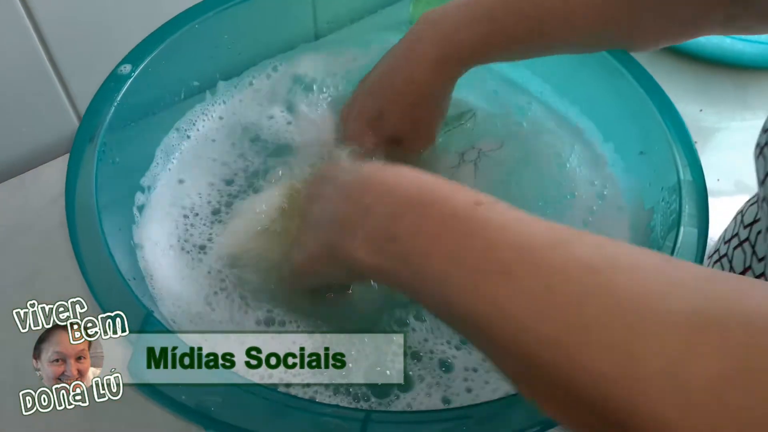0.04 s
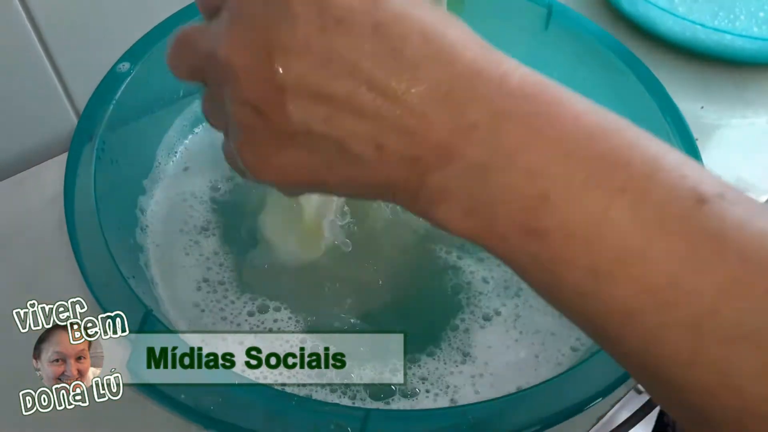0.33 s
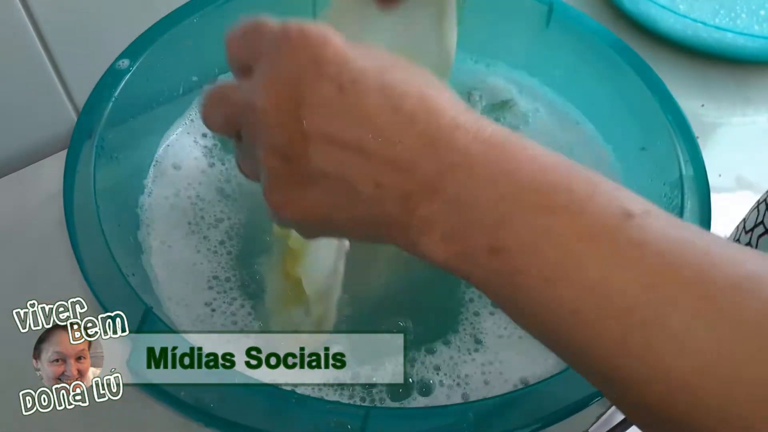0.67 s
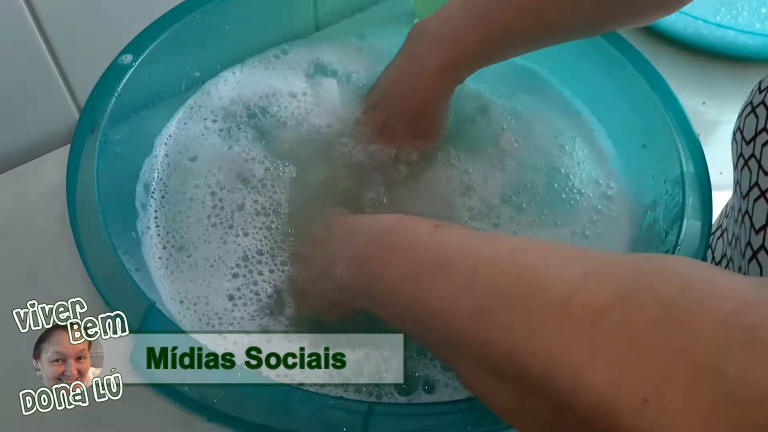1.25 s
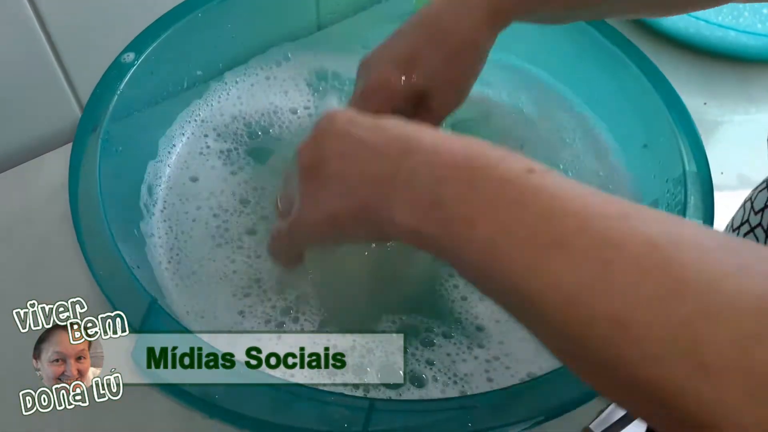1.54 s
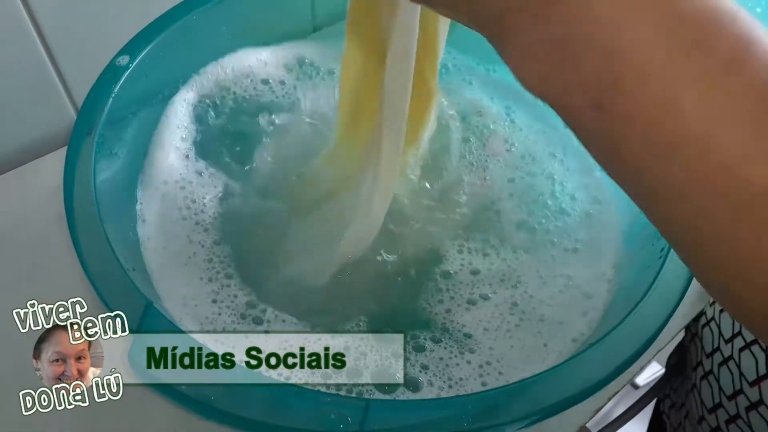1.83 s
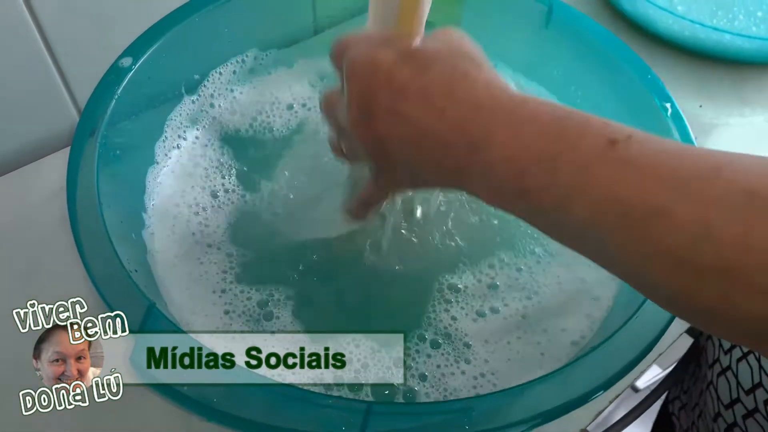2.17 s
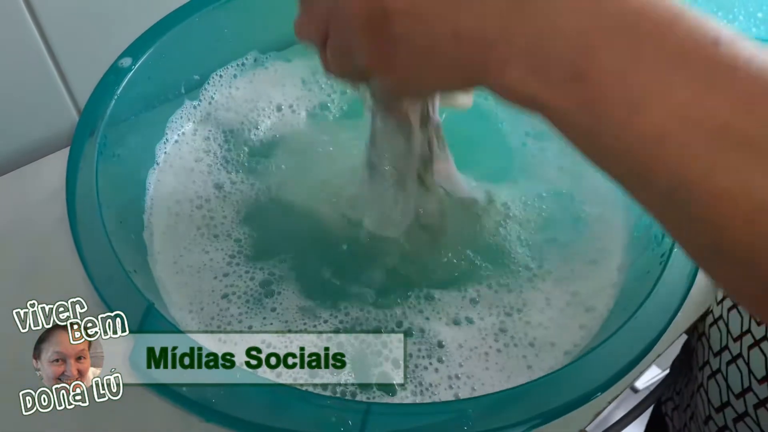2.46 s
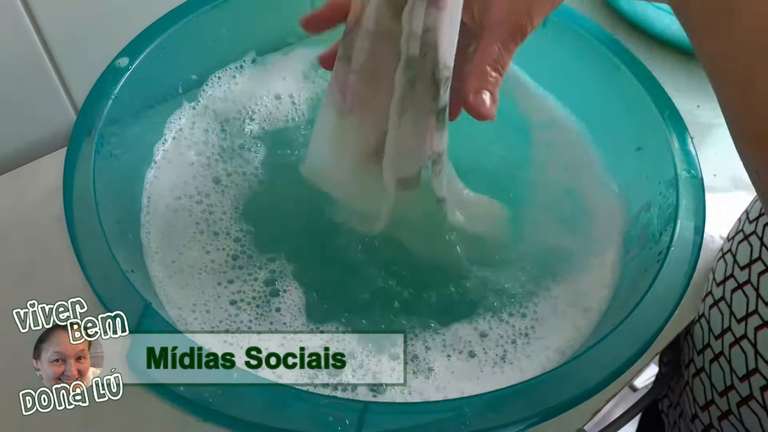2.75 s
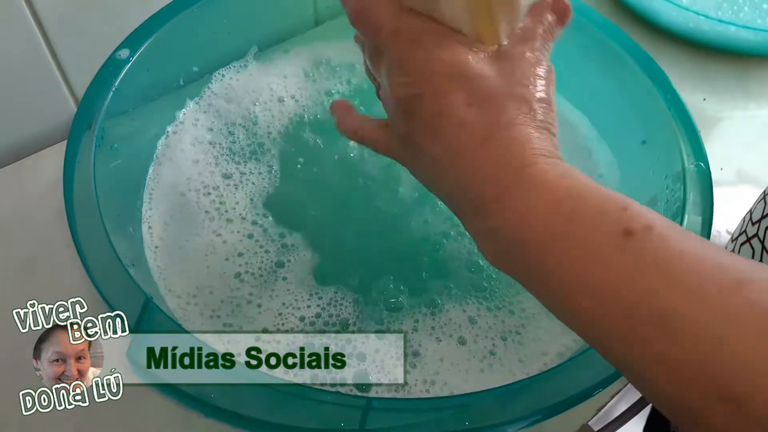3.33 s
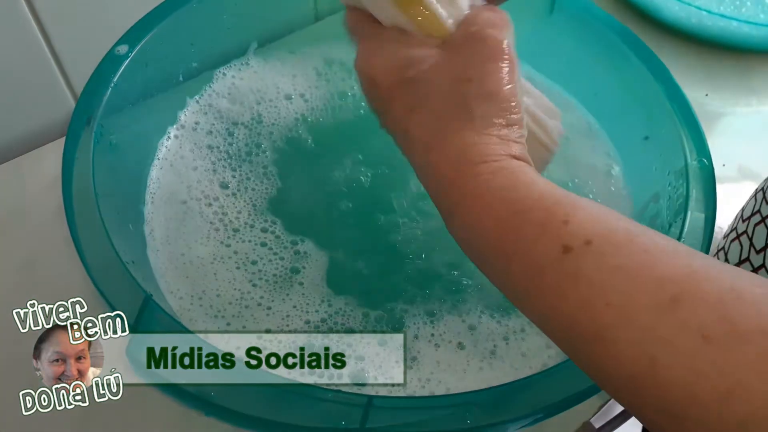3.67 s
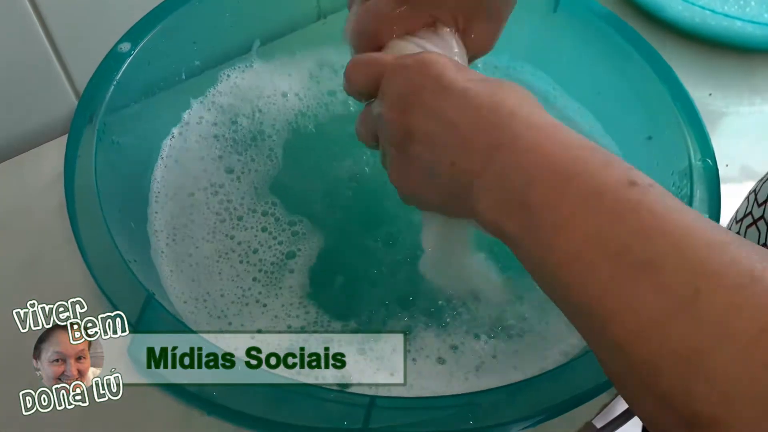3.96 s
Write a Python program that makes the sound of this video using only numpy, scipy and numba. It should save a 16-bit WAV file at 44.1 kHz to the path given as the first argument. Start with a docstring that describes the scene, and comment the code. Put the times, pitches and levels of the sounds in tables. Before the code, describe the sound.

Close splashing and bubbling of soapy water as a cloth is washed by hand in a basin. After a short lull, more sloshes, drips and plops follow. The small tiled room rings briefly, with a faint rumble underneath.

```python
"""A cloth is dunked, lifted and squeezed in a plastic basin of soapy water, in a small tiled room.
A low rumble and a wavering hum lie under it all. From the start each move stirs up swarms of bubbles and
throws spray; air pockets plop and falling water slaps the surface, building to a splashy peak near 0.9 s.
After a lull the cloth moves again from 1.5 s, with the sharpest slap at 2.7 s, deep plops at 3.2 s and
a last slosh just before 4 s. The room rings briefly after each splash."""
import sys
import numpy as np
from scipy import signal
from scipy.fft import rfft, irfft
from scipy.io import wavfile
from scipy.ndimage import map_coordinates
from numba import njit

SR = 44100
rng = np.random.default_rng(int(sys.argv[2]) if len(sys.argv) > 2 else 0)


def log_audio(samples):
    """Write samples as a 16-bit WAV file to the path given in sys.argv[1]."""
    # one column per channel
    frames = np.atleast_2d(samples).T
    # limit to full scale, then quantise
    limited = np.clip(frames, -1, 1)
    pcm = np.round(limited * 32767).astype(np.int16)
    wavfile.write(sys.argv[1], SR, pcm)


N = 176400
TIME = np.arange(N) / SR


def from_db(db):
    """Decibels to gain."""
    return 10 ** (np.asarray(db) / 20)


def rms_one(x):
    """Scale to unit rms."""
    return x / np.sqrt(np.mean(x ** 2) + 1e-20)


def band(x, low_hz, high_hz):
    """Band-pass."""
    sos = signal.butter(2, [low_hz, min(high_hz, .45 * SR)], "band", fs=SR, output="sos")
    return signal.sosfilt(sos, x)


def panned(x, pan_db):
    """Mono to stereo by a level difference; positive is left."""
    return x * from_db([[pan_db / 2], [-pan_db / 2]])


def add(out, start, x):
    """Mix a short stereo sound in at `start` seconds."""
    i = max(int(start * SR), 0)
    out[:, i:i + x.shape[1]] += x[:, :max(N - i, 0)]


def wander(shape, speed_hz):
    """Random drift of unit rms, mostly slower than speed_hz."""
    hz = np.fft.rfftfreq(N, 1 / SR)
    return rms_one(irfft(rfft(rng.standard_normal(shape)) / (1 + (hz / speed_hz) ** 2), N))


def diffuse_noise(size, spacing_m_per_c=0.00054):
    """Noise from all sides at two mics (spacing in s of travel): alike in the bass, wide in the treble."""
    alike = .98 * np.sinc(2 * np.fft.rfftfreq(size, 1 / SR) * spacing_m_per_c)
    mid, side = rfft(rng.standard_normal((2, size)))
    return irfft(np.sqrt((1 + alike) / 2) * mid + np.sqrt((1 - alike) / 2) * side * [[1], [-1]], size)


# Spectrum of the room tone: (frequency [Hz], density [dB per Hz])
ROOM_TONE = [(15, -122), (25, -101), (40, -78.5), (60, -78.5), (110, -75.5), (180, -78), (250, -82),
             (390, -78), (560, -86.5), (1100, -89.5), (2000, -100), (3200, -109), (6000, -121),
             (10000, -113), (16000, -120)]


def room_tone(hum_hz=123, hum_db=-58):
    """A steady bed of rumble and faint hiss, with a hum that wavers in level and phase."""
    hz = np.fft.rfftfreq(N, 1 / SR)
    points_hz, density_db = np.transpose(ROOM_TONE)
    colour = from_db(np.interp(np.log(hz + 1), np.log(points_hz), density_db))
    rumble = irfft(rfft(diffuse_noise(N)) * colour, N) * np.sqrt(SR / 2)
    swell, slip = 0.99 * wander((2, N), speed_hz=2)
    hum = (1 + swell / 2) * np.sin(2 * np.pi * hum_hz * TIME + slip)
    return rumble + from_db(hum_db) * rms_one(hum)


# Fader ride of the water running off the cloth: (time [s], level [dB])
RUNOFF = [(0, -8), (.3, 6), (1.0, 7.5), (1.1, -47), (1.46, -34), (1.68, 3.5), (2.8, 0), (3.05, 1.5),
          (3.3, 2.5), (4, 0.5)]
# Moves of the cloth and how hard each drives the three swarms:
# (time [s], length [s], large bubbles [dB], small bubbles [dB], spray [dB])
CLOTH_MOVES = [(0.107, 0.1, -52.5, -64, -76), (0.214, 0.1, -50, -56.5, -62),
               (0.364, 0.022, -61, -49.5, -53.5), (0.454, 0.05, -43.5, -55, -50.5),
               (0.496, 0.083, -68, -59, -79), (0.633, 0.086, -41, -43.5, -47),
               (0.696, 0.076, -39, -41.5, -46), (0.768, 0.023, -38, -39, -57), (0.845, 0.03, -40, -42, -52),
               (0.962, 0.047, -36, -46, -50.5), (1.53, 0.079, -53.5, -68.5, -67),
               (1.636, 0.072, -52.5, -56, -58.5), (1.716, 0.099, -46.5, -55, -61),
               (1.9, 0.049, -48.5, -48, -51), (1.96, 0.077, -44.5, -45.5, -50.5),
               (2.074, 0.12, -51.5, -56.5, -61.5), (2.232, 0.097, -70, -52.5, -55),
               (2.279, 0.068, -42.5, -43.5, -56), (2.356, 0.055, -43.5, -53, -50),
               (2.493, 0.071, -52.5, -48, -51), (2.548, 0.079, -41.5, -45.5, -53),
               (2.635, 0.14, -45.5, -53, -59), (2.867, 0.049, -54, -56, -55),
               (3.128, 0.033, -53.5, -55, -72), (3.224, 0.02, -46.5, -51, -44.5),
               (3.325, 0.15, -58, -58.5, -66), (3.424, 0.24, -51, -70, -72),
               (3.683, 0.15, -50, -54.5, -62.5), (3.832, 0.047, -46.5, -45, -51.5),
               (3.888, 0.097, -48, -50.5, -60), (3.928, 0.025, -57, -54, -42)]
BUSY_DB = -44.5   # stirring strength at which bubbles and drops come at their nominal rates


def stirring(layer, runoff_db, lead_s=0.026, attack_share=.24, release_s=0.0097):
    """Drive of one swarm: each move swells, holds and dies over the runoff; long moves start gently."""
    power = from_db(np.interp(TIME, *np.transpose(RUNOFF)) + runoff_db) ** 2
    for start, length, *levels_db in CLOTH_MOVES:
        span = slice(int(max(start - lead_s, 0) * SR), int((start + length + 10 * release_s) * SR))
        t = TIME[span] - start
        attack = np.clip((t + lead_s) / (attack_share * length + lead_s), 0, 1) ** 2
        release = np.exp(-np.maximum(t - length, 0) / release_s)
        power[span] += (attack * release * from_db(levels_db[layer])) ** 2
    return np.sqrt(power)


@njit
def ring_bubbles(born, left, right, phase_step, life, rise):
    """Each bubble is a sine that dies by 60 dB over `life` samples as its pitch climbs by `rise`."""
    out = np.zeros((2, N))
    for k in range(len(born)):
        level, loss = 1., np.exp(-np.log(1000) / life[k])
        for i in range(min(int(life[k]), N - born[k])):
            ring = level * np.sin(phase_step[k] * i * (1 + rise * i / life[k] / 2))
            out[0, born[k] + i] += left[k] * ring
            out[1, born[k] + i] += right[k] * ring
            level *= loss
    return out


def swarm(strength, low_hz, high_hz, per_s, cycles, spread_db, tilt_db, width_db=9.5, foam_db=-16):
    """Random bubbles over a foam hiss; harder stirring makes more and louder ones."""
    rate = per_s * (strength / from_db(BUSY_DB)) ** .45
    chance, pitch, damping, side = rng.random((4, N))
    octaves = pitch * np.log2(high_hz / low_hz)
    sizes_db = spread_db * np.minimum(rng.exponential(1, N), 3.2) + tilt_db * octaves
    sizes = rms_one(from_db(sizes_db)) * rng.choice([-1, 1], N)
    born = np.flatnonzero(chance < rate / SR)
    hz = low_hz * 2 ** octaves[born]
    life = cycles * 2 ** (2 * damping[born] - 1) / hz * SR
    # the swarm's loudness follows the stirring, whatever the rate and ring time
    peak = (sizes * strength * np.sqrt(SR / rate))[born] * 2 * np.sqrt(np.log(1000) / life)
    pan = from_db(width_db * (2 * side[born] - 1))
    bubbles = ring_bubbles(born, peak * pan, peak / pan, 2 * np.pi * hz / SR, life, rise=0.049)
    foam = from_db(foam_db) * strength * rms_one(band(rng.standard_normal((2, N)), low_hz, high_hz))
    return band(bubbles + foam, low_hz * 0.85, high_hz * 0.82)


# Large bubbles, small bubbles and spray: (lowest pitch [Hz], highest pitch [Hz], nominal rate [1/s],
# typical ring [cycles], level spread [dB], gain [dB], tilt [dB per octave], runoff level [dB])
BUBBLE_LAYERS = [(557, 3086, 560, 30.4, 2, -7.5, 4.5, -58), (2686, 8300, 900, 16, 4.5, -5, 0.5, -68),
                 (7750, 15900, 860, 24, 4.5, -2, 11, -70)]


def sloshes(clump_db=3, churn_hz=(194, 604), churn_db=-11.5):
    """Water breaks in quick, uneven clumps of bubbles and spray, with a dull churning underneath."""
    clumps = rms_one(from_db(clump_db * np.clip(wander(N, speed_hz=70), -2, 2)))
    strengths, layers = [], []
    for layer, (*voicing, gain_db, tilt_db, runoff_db) in enumerate(BUBBLE_LAYERS):
        strength = clumps * stirring(layer, runoff_db)
        strengths.append(strength)
        layers.append(from_db(gain_db) * swarm(strength, *voicing, tilt_db))
    large, small, spray = layers
    churn = from_db(churn_db) * strengths[0] * rms_one(band(rng.standard_normal(N), *churn_hz))
    return large + small + panned(spray, pan_db=1) + churn


def droplets(per_s=130, level_db=-33, range_db=12, width_db=9.5, band_hz=(4200, 15700)):
    """Flung drops tick on the surface, one click each, more and harder as the spray grows."""
    spray = stirring(layer=2, runoff_db=BUBBLE_LAYERS[2][-1])
    drive = np.sqrt(spray / from_db(BUSY_DB))
    chance, softness, side = rng.random((3, N))
    ticks = (chance < per_s * drive / SR) * from_db(level_db - range_db * softness) * drive
    pan = from_db(width_db * (2 * side - 1.5) * [[1], [-1]])   # mostly to the right
    return band(ticks * pan + 1e-18, *band_hz)


# Single air pockets that ring out: (time [s], pitch [Hz], level [dB])
AIR_POCKETS = [(0.15, 1210, -36.5), (0.152, 3150, -36.5), (0.258, 1360, -36.5), (0.462, 800, -22),
               (0.46, 2600, -32), (0.649, 1500, -31.5), (0.69, 1110, -29.5), (0.69, 2170, -29),
               (0.711, 3580, -22.5), (0.73, 936, -25), (0.73, 2320, -26.5), (0.774, 1830, -26),
               (0.817, 1600, -30), (0.84, 795, -23.5), (0.85, 900, -36), (0.8515, 9100, -23),
               (0.865, 1320, -27), (0.944, 850, -28), (0.97, 1070, -31), (0.978, 1083, -25),
               (0.979, 2660, -29), (0.985, 1560, -28), (0.995, 2830, -30), (1.015, 2280, -30),
               (1.671, 1510, -29.5), (1.749, 3800, -33.5), (1.932, 1430, -37), (1.95, 1446, -31.5),
               (2.025, 1850, -34.5), (2.189, 648, -39), (2.303, 1430, -30.5), (2.322, 1740, -30.5),
               (2.328, 796, -34), (2.347, 785, -33), (2.353, 1647, -23.5), (2.438, 4150, -33),
               (2.573, 1034, -31.5), (2.57, 2190, -27), (2.594, 1680, -33), (2.662, 590, -34),
               (2.692, 8410, -14), (2.772, 747, -35), (2.915, 795, -39), (3.122, 1660, -34.5),
               (3.153, 2410, -33), (3.227, 529, -20), (3.227, 1640, -34.5), (3.254, 472, -30.5),
               (3.283, 536, -34), (3.313, 1780, -35), (3.831, 3750, -30), (3.856, 2440, -33),
               (3.923, 2860, -33), (3.957, 2100, -35.5)]


def plops(cycles=14.9, rise=0.033, attack_s=0.00087, trim_db=-2.5):
    """An air pocket rings as a dying sine that rises a little as it nears the surface."""
    out = np.zeros((2, N))
    for start, hz, level_db in AIR_POCKETS:
        life = cycles / hz
        t = TIME[:int(life * SR)]
        envelope = (1 - np.exp(-t / attack_s)) * np.exp(-np.log(1000) * t / life)
        tone = np.sin(2 * np.pi * hz * t * (1 + rise * t / life / 2))
        plop = from_db(level_db + trim_db) * envelope / envelope.max() * tone
        add(out, start, panned(plop, rng.normal()))
    return out


# Noise bands of a slap, body then crack: (low edge [Hz], high edge [Hz])
BODY_AND_CRACK = [(520, 4730), (5900, 13500)]
# Falling water hitting the surface: (time [s], level [dB], body over crack [dB], left over right [dB])
SURFACE_SLAPS = [(.3828, -34.5, -23, 10), (.411, -30, -25, 7), (.4465, -27, -12, -2), (0.6466, -31, 3.5, 9),
                 (.709, -34, 9, -3), (.717, -28, 4, -9), (.7314, -30, 10, 11), (.799, -22.5, -12, 1),
                 (.8405, -21.5, 4, -15), (.8464, -24, -16, 4), (.851, -21.5, -8, 26.5),
                 (.853, -19.5, -19, -19.5), (.9707, -29, -19, -16), (.9802, -24.5, 3.5, 4),
                 (1.627, -30, -26, 1), (1.9131, -31.5, -20, 15), (2.0033, -30, -18, -9),
                 (2.2318, -32, -18, 5), (2.2775, -29, -31, -2), (2.2965, -20, -7, 5),
                 (2.3165, -20, -14, -1), (2.3525, -34, 11.5, 4), (2.5042, -36.5, 5.5, -13),
                 (2.549, -32, -2, -14), (2.572, -30, -1, 6), (2.5975, -24.5, -5, 11), (2.6903, -37, -5, -4),
                 (2.6919, -9.5, -8.5, 5), (2.7015, -20, -24, -7), (2.882, -37.5, -20, 4),
                 (2.9035, -32, -20, 15), (3.1228, -58.5, 22.5, 23), (3.1702, -31, -3, 0),
                 (3.2285, -28, -0.5, 0), (3.6107, -41, -11, 3), (3.706, -52, 11.5, 18),
                 (3.833, -32, -10, 7), (3.928, -21, -29, 7)]


def slaps(decay_s=.00042, dent_hz=960, dent_decay_s=0.0011, dent_db=-5.5, trim_db=-8.5):
    """A millisecond of bright crack with a duller body and the hollow knock of the dented surface."""
    out, t = np.zeros((2, N)), TIME[:512]
    envelope = t / decay_s * np.exp(1 - t / decay_s)
    dent = from_db(dent_db) * rms_one(np.sin(2 * np.pi * dent_hz * t) * np.exp(-t / dent_decay_s))
    for start, level_db, body_db, pan_db in SURFACE_SLAPS:
        body, crack = [rms_one(band(rng.standard_normal(len(t)) * envelope, *edges))
                       for edges in BODY_AND_CRACK]
        burst = crack + from_db(body_db) * (body + dent)
        add(out, start, panned(from_db(level_db + trim_db) * burst * envelope.std(), pan_db))
    return out


# Reverb of the tiled room: (frequency [Hz], time to fall 60 dB [s], wet level [dB])
TILE_REVERB = [(252, 0.42, -6.5), (490, 0.32, -4.5), (835, 0.33, 1), (1860, 0.29, 2), (5400, 0.3, 1),
               (9000, 0.29, 3.5), (15500, 0.26, 3.5)]


def reflections(size=16384, first_echo_s=.002, early_decay_s=.012):
    """Dense echoes from one spot in the basin: a strong early cluster, then a tail longest in the bass."""
    t, hz = TIME[:size], np.fft.rfftfreq(size, 1 / SR)
    noise = rfft(diffuse_noise(size))
    log_centres = np.log([row[0] for row in TILE_REVERB])
    early = (t > first_echo_s) * (1 + np.exp(-t / early_decay_s))
    response = np.zeros((2, size))
    for solo, (_, t60, wet_db) in zip(np.eye(len(TILE_REVERB)), TILE_REVERB):
        decay = early * np.exp(-np.log(1000) * t / t60)
        noise_band = irfft(noise * np.interp(np.log(hz + 1), log_centres, solo), size)
        response += from_db(wet_db) * noise_band * decay / np.sqrt(np.sum(decay ** 2))
    return response


def tiled_room(direct, send, right_lag_s=.00006, sway_hz=1.7, hop=N // 28):
    """Direct sound, swaying with the cloth, plus reflections of `send` that change as the arms move."""
    lag = right_lag_s * (1 + np.sin(2 * np.pi * sway_hz * TIME))
    out = np.array([direct[0], map_coordinates(direct[1], [(TIME - lag) * SR], order=3)])
    for centre in range(0, N + 1, hop):
        span = np.arange(max(centre - hop, 0), min(centre + hop, N))
        crossfade = np.cos(np.pi / 2 * (span - centre) / hop)
        add(out, span[0] / SR, signal.fftconvolve(send[:, span] * crossfade, reflections(), axes=1))
    return out


def scene():
    """The water in the room, over the room tone; surface hits sit drier than the bubbles."""
    water = sloshes() + plops()
    hits = slaps() + droplets()
    return tiled_room(water + hits, send=water + from_db(-5) * hits) + room_tone()


# Treble peak and dip of the microphone: (frequency [Hz], width [Hz], gain [dB])
MIC_EQ = [(8930, 1670, 7.5), (7450, 1560, -6.5)]


def record(dry, cutoff_hz=16300):
    """The microphone port rings in the treble; a steep low-pass cuts the top."""
    for hz, width_hz, gain_db in MIC_EQ:
        gain, width = from_db(gain_db / 2), np.pi * width_hz / SR
        tuning = -2 * np.cos(2 * np.pi * hz / SR)
        dry = signal.lfilter([1 + width * gain, tuning, 1 - width * gain],
                             [1 + width / gain, tuning, 1 - width / gain], dry)
    return signal.sosfilt(signal.ellip(10, .2, 80, cutoff_hz, fs=SR, output="sos"), dry)


dry = scene()
out = record(dry)
log_audio(out)
```